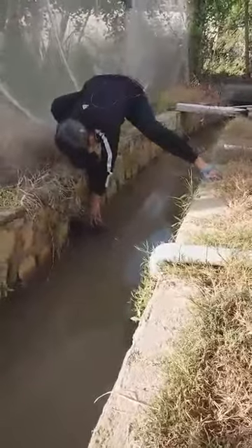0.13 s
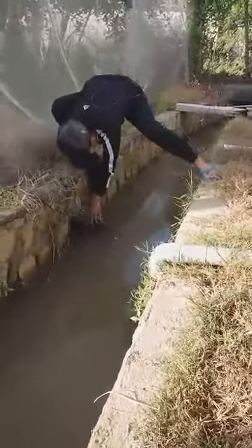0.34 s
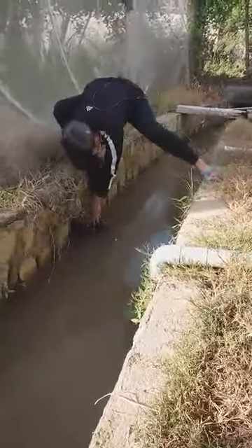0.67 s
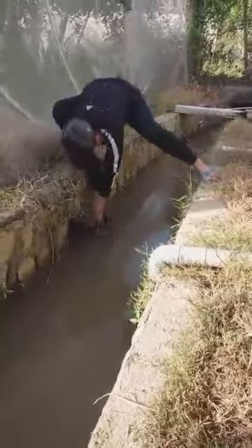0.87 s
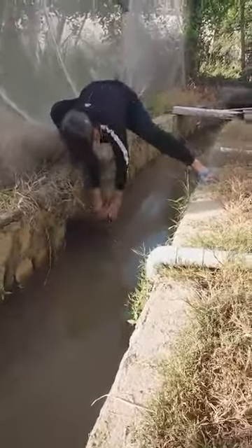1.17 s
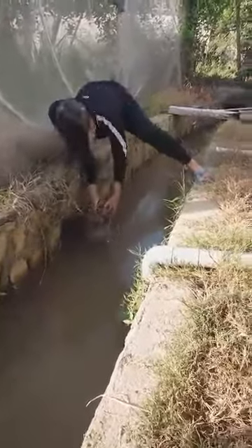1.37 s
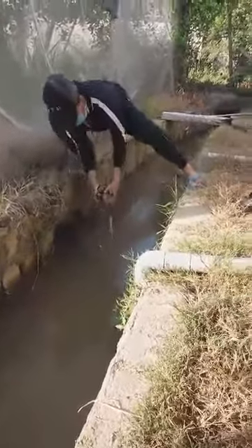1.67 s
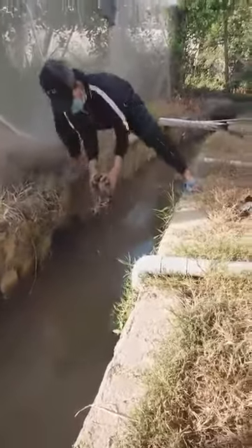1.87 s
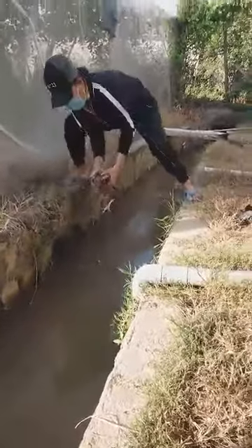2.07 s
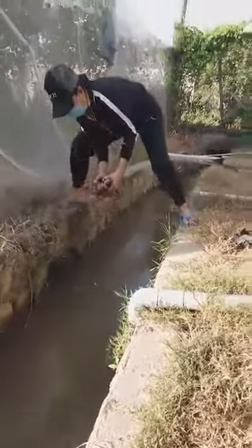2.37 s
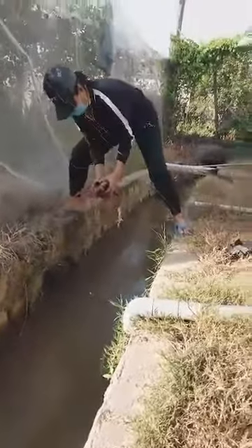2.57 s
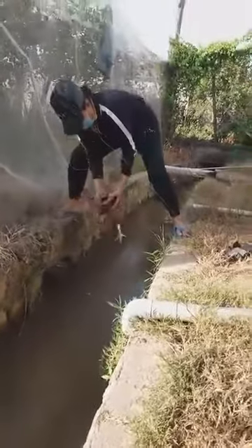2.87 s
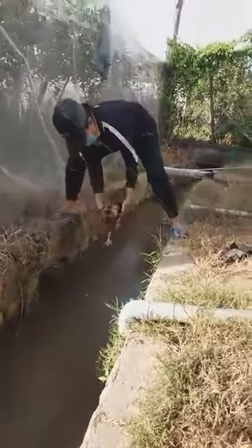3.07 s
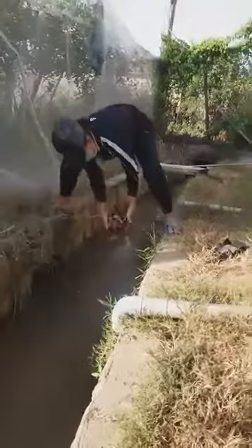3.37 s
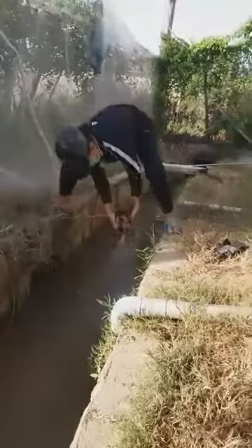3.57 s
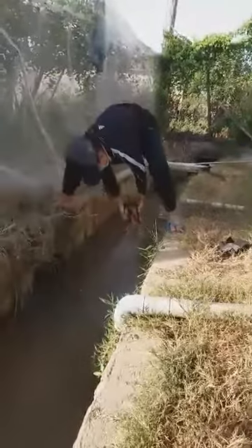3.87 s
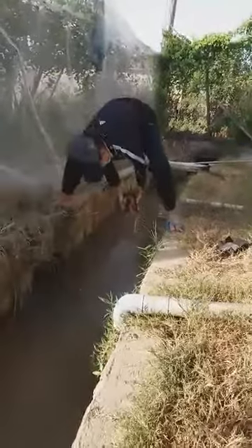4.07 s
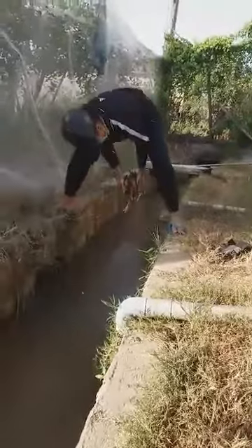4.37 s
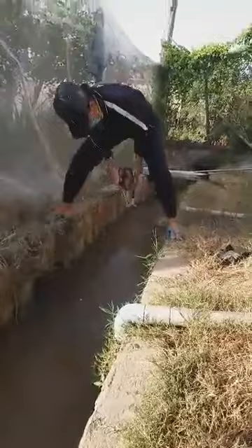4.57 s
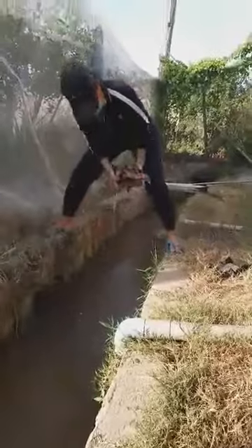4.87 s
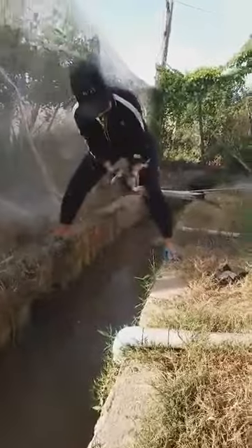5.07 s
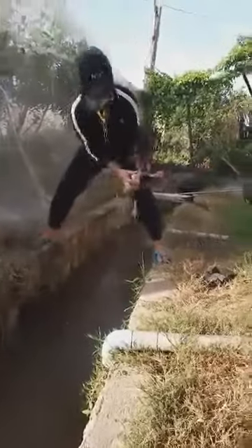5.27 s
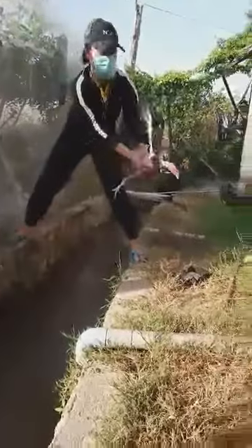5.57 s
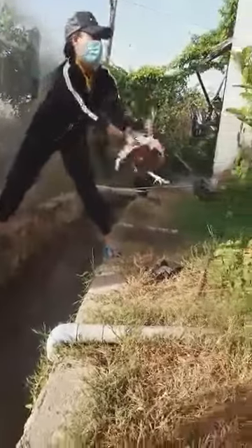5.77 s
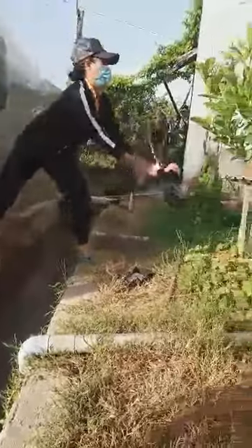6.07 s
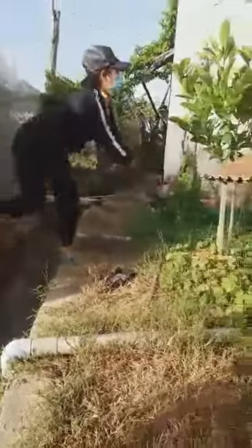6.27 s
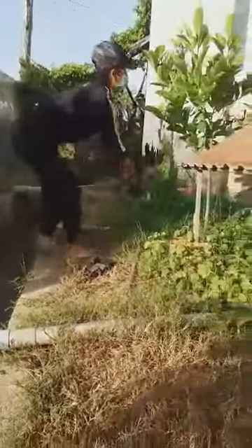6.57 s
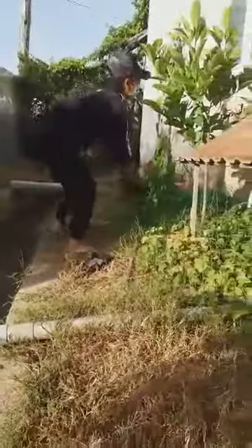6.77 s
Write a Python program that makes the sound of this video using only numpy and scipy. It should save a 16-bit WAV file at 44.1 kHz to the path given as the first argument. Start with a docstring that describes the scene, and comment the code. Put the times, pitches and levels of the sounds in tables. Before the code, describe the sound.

Hoarse, whistly chicken gasps over sparse water drops outdoors, then crunching steps in dry grass, one long rasping squawk and a short higher one.

```python
"""Soaked chicken by a ditch

A soaked chicken, lifted out of a ditch a few metres away, gasps, whistles and hisses, then squawks twice.
Its airway is noise and gliding tones shaped by resonances; its squawks are two pulse trains cut by a flutter.
Filtered noise bursts make the drops of water and the dry grass that crackles and thuds under moving feet.
Decaying noise echoes stand for ditch sides, a wall and the open; rumble, air, birds and an insect lie behind."""
import sys
import numpy as np
from scipy import signal
from scipy.fft import rfft, irfft
from scipy.io import wavfile
from scipy.ndimage import uniform_filter1d

SR = 44100
rng = np.random.default_rng(int(sys.argv[2]) if len(sys.argv) > 2 else 0)


def persist_wave(psi):
    """Save psi, clipped to +-1, as 16-bit WAV."""
    counts = np.round(np.clip(psi, -1, 1) * 32767).astype(np.int16)
    wavfile.write(sys.argv[1], SR, np.atleast_2d(counts).T)


N = 305172  # samples, about 6.9 s
T = np.arange(N) / SR

# spectrum of the distant rumble: (frequency [Hz], level [dB])
RUMBLE_SPECTRUM = [(15, -15), (33, -45), (42, -21), (55, -1.5), (75, 2.5), (110, -0.5), (155, -1.5),
                   (210, -6.5), (290, -15), (400, -20), (550, -41)]
# spectrum of the open air: (frequency [Hz], level [dB])
AIR_SPECTRUM = [(240, -28.5), (400, -7), (587, -6.5), (835, -9), (982, -10), (1070, -8.5), (1930, -12.5),
                (2310, -10), (3280, -15), (4610, -15), (5580, -14), (7490, -40.5), (8550, -26.5),
                (12500, -28.5), (13500, -37)]
RUMBLE_DB, AIR_DB = -54, -63.5
# thin distant bird calls: (time [s], length [s], level [dB], frequency [Hz])
BIRD_CALLS = [(.05, 0.73, -76, 6170), (.03, 0.12, -60.5, 1940), (.1, 0.082, -65, 3870),
              (.2, .11, -70, 4200), (.62, 0.16, -70, 4130), (1.75, 0.18, -70, 4120), (2.0, 0.48, -75, 4900),
              (3.0, 0.041, -67.5, 6100), (3.3, 0.12, -72, 4800), (3.75, 0.031, -64, 3480),
              (3.76, .14, -71, 5660), (4.1, 0.076, -77, 4750), (4.42, 0.54, -77, 4600)]
INSECT_HZ, INSECT_DB, INSECT_UNTIL_S, CHIRP_EVERY_S, CHIRP_S = 8900, -75, 1.05, 0.199, 0.24

# gasps: (time [s], length [s], effort [dB], swell from start to end [dB], throat resonance at the start [Hz],
# in the middle [Hz], at the end [Hz], hiss relative to the effort, before a common trim [dB])
GASPS = [ (0.252, 0.028, -40.5, -14, 1820, 1900, 2000, -22),
         (0.478, 0.032, -41.5, 0, 1710, 1780, 1690, -10), (0.547, 0.029, -48, 2, 1980, 1860, 1690, -5),
         (0.734, .2, -41, -5, 1990, 2455, 2460, -7.5), (0.993, .06, -41, 1, 1430, 1400, 1830, -5.5),
         (1.09, 0.095, -33.5, -3.5, 2470, 2416, 1860, -6.5),
         (1.264, 0.026, -38.5, 15.5, 2020, 1960, 1890, -15), (1.35, 0.11, -35, 5.5, 2190, 2170, 1910, -2.5),
         (1.56, 0.047, -44.5, 4, 1600, 1680, 2180, -10), (1.654, 0.05, -35, -10, 1870, 1800, 1600, -8),
         (1.908, 0.032, -32, 9, 1780, 1685, 1510, -12.5), (2.11, 0.24, -33, 3.5, 1810, 2143, 1940, -7),
         (2.517, 0.13, -33.5, -9, 1825, 2280, 1850, -4), (2.867, 0.067, -31.5, -2.5, 1840, 1877, 1690, -14),
         (3.146, 0.041, -35.5, -2, 1810, 1695, 1715, -10), (3.418, 0.048, -39, 11, 1930, 1776, 1670, -15.5),
         (3.665, 0.054, -30, -6, 1970, 2030, 1740, -17), (3.962, 0.04, -34.5, 3, 1790, 1730, 1720, -14),
         (4.288, 0.038, -46.5, 5, 1740, 1640, 1650, -9), (4.787, 0.029, -40, 7.5, 1850, 1770, 1555, -16),
         (5.008, .037, -39, 8.5, 1780, 1790, 1500, -10.5), (5.202, .049, -29, 0, 1650, 1720, 1800, -12),
         (5.41, 0.12, -30, 10, 2000, 2320, 1760, -16.5), (5.7, .11, -30, 11, 1990, 1890, 1640, -18),
         (6.031, .12, -31.5, 3, 1720, 1633, 1590, -11.5), (6.866, 0.051, -34, 9, 2070, 1805, 1750, -24)]
# spectrum of air in the windpipe: (frequency [Hz], level [dB])
WINDPIPE_SPECTRUM = [(410, -53.5), (700, -6.5), (943, -23.5), (1100, 2.5), (1210, -7.5), (1380, 9),
                     (1500, -22), (1620, -26), (1780, 11), (2060, -32), (2230, 16.5), (2580, -19.5),
                     (2890, -20), (3160, -14), (4800, -24.5), (6240, -105), (10600, -120)]
# spectrum of the hiss: (frequency [Hz], level [dB])
HISS_SPECTRUM = [(2400, -8), (3800, -11.5), (4800, -3.5), (5300, -15.5), (5900, -1.5), (6400, -4),
                 (7100, -10), (8200, -25), (10100, -18.5), (11500, -22), (13300, -21)]
# resonances of the throat: (multiple of the main resonance, width [Hz], level [dB])
THROAT_RESONANCES = [(0.758, 233, 3), (1.0, 232, 8), (1.221, 280, 6), (1.55, 352, -5.5), (1.92, 312, -9.5),
                     (3.0, 400, -46.5)]
# narrow rings of the beak in the hiss: (multiple of the throat resonance, width [Hz], level [dB])
BEAK_RINGS = [(1.5, 200, -5), (2.0, 200, -4), (2.75, 220, -7.5), (3.05, 220, -24)]
GASP_ATTACK_S, GASP_RELEASE_DB_PER_S = 0.0035, 860
SLACK_DB_PER_S = 32.5  # the longer a gasp, the more its push slackens midway
HISS_FADE_DB = -6  # the hiss weakens from start to end as the beak closes
# listed whistles of the air jet: (time [s], length [s], level [dB], start [Hz], end [Hz])
WHISTLES = [(.755, 0.011, -28, 2070, 2240), (0.786, 0.0063, -28, 2490, 2570),
            (1.026, 0.0085, -30, 1376, 1440), (1.132, 0.011, -26, 2310, 2430),
            (1.928, 0.0294, -23, 1790, 1560), (2.112, 0.013, -22.5, 1823, 1750),
            (2.138, 0.011, -21.5, 1885, 1760), (2.315, 0.0064, -27, 1980, 2010),
            (2.328, 0.049, -30, 1930, 1604), (2.514, .028, -24, 1814, 2130),
            (2.553, 0.012, -27, 1936, 2170), (2.574, 0.0072, -24.5, 2260, 1930),
            (2.877, 0.013, -21.5, 1780, 1824), (2.906, 0.0075, -21, 1850, 1830),
            (3.173, 0.01, -21.5, 1773, 1650), (3.677, 0.021, -21.5, 1744, 2514),
            (3.702, 0.013, -24.5, 1750, 1810), (3.975, 0.011, -26, 1780, 1850),
            (3.994, .009, -26.5, 1684, 1670), (5.226, .025, -19, 1814, 1664),
            (5.504, 0.011, -22, 1980, 1840), (5.526, 0.02, -24.5, 1870, 1685),
            (5.781, 0.015, -18, 1980, 1920), (5.803, 0.015, -19, 1777, 1767), (6.1, 0.016, -23, 1420, 1450),
            (6.124, 0.017, -20, 1830, 1760)]
# further whistles by chance: rate, length, level above the effort, largest detuning as a share of the resonance
CHANCE_PER_S, CHANCE_S, CHANCE_DB, CHANCE_DETUNE = 16, .01, 5, 0.046
# wet catches in the throat: (time [s], peak of the squeak before a common trim [dB], ring [Hz])
CATCHES = [(.484, -27.5, 1577), (1.389, -15, 2077), (1.446, -13.5, 2105), (2.536, -14.5, 2037),
           (3.69, -44, 2080)]
# wheezes and gurgles in the airway: (time [s], length [s], level before the bass cut [dB], resonance [Hz])
GURGLES = [(.75, .16, -53.5, 667), (.79, 0.083, -50, 3490), (1.0, 0.041, -44.5, 900),
           (1.08, 0.021, -43, 3430), (1.115, 0.047, -41.5, 496), (1.117, .018, -38.5, 980),
           (1.385, 0.049, -51.5, 490), (1.44, .035, -42, 496), (1.44, 0.026, -41, 1015),
           (2.3, 0.083, -57, 780), (2.52, 0.051, -45.5, 596), (2.858, 0.021, -44.5, 3330),
           (3.972, .045, -45, 1310), (3.975, 0.047, -50, 3120), (4.29, .037, -52, 3380),
           (4.8, 0.032, -46, 1275), (5.025, 0.033, -41, 1170)]

# drops and splashes on the water: (time [s], peak before a common trim [dB])
DROPS = [(1.049, -28.5), (1.2579, -34.5), (1.2768, -29.5), (1.3588, -26), (1.3702, -28), (1.409, -40),
         (1.519, -28), (1.604, -36), (2.0252, -44), (2.4627, -34.5), (3.278, -44)]
# spectrum of a splash: (frequency [Hz], level [dB])
SPLASH_SPECTRUM = [(400, -10), (1200, -7), (2500, -8.5), (6000, -9), (8000, -21.5), (10000, -14),
                   (13000, -18)]

# steps and shuffles: (time [s], length [s], crackle [dB], thud before a common trim [dB])
STEPS = [(4.921, 0.13, -57.5, -74), (5.026, 0.12, -53.5, -45), (5.23, 0.053, -57, -57),
         (5.367, 0.05, -56, -41), (5.403, 0.22, -45, -62), (5.687, 0.19, -45.5, -51),
         (6.001, 0.15, -53, -61), (6.211, 0.05, -58, -40.5), (6.39, 0.05, -63, -51),
         (6.541, 0.18, -44, -46)]
# spectrum of a footfall: (frequency [Hz], level [dB])
THUD_SPECTRUM = [(50, -20), (90, 5), (180, 2.5), (280, 2.5), (400, -17), (800, -7.5), (1500, -28)]
# dry stalks snapping underfoot: (time [s], peak before a common trim [dB])
SNAPS = [(5.038, -36), (5.0624, -35), (5.1168, -34), (5.2392, -24), (5.2561, -21), (5.2714, -52),
         (5.392, -25), (5.4205, -24), (5.4893, -35), (5.572, -34.5), (5.6471, -26), (5.6537, -28),
         (5.7036, -26), (5.734, -20.5), (5.897, -35.5), (5.9658, -28.5), (6.0108, -29.5), (6.1313, -28.5),
         (6.4093, -28.5), (6.672, -27)]
# spectrum of dry stalks: (frequency [Hz], level [dB])
STALK_SPECTRUM = [(150, -36), (250, -5.5), (586, -1.5), (740, -1.5), (950, 1.5), (1390, 3), (2380, 4.5),
                  (3670, -4), (4640, 2), (6480, -3), (7530, -14), (12400, -10), (13500, -54)]
# between steps the grass keeps rustling and the feet shuffle
WALK_FROM_S, RUSTLE_DB, SHUFFLE_DB, THUD_TRIM_DB = 5.08, -53, -51, -4

# closed-beak moan before the first squawk: (level [dB], start [Hz], end [Hz])
MOAN = (-37.5, 244, 355)
MOAN_S, MOAN_LENGTH_S, MOAN_WAVER = 6.108, .085, .025  # the waver is an rms share of the pitch

# squawks: (time [s], time until the beak starts to shut [s], opening time [s], low resonance [dB],
# open beak [dB], hiss [dB], low resonance [Hz]); levels before the motion of the beak
SQUAWKS = [(6.167, 0.38, 0.058, -27, -16, -37.5, 783), (6.688, 0.098, 0.017, -23, -17, -37.5, 864)]
# voice of the long squawk: (time [s], pitch [Hz], second membrane [Hz], roughness [0-1], flutter [1/s])
LONG_VOICE = [(6.16, 349, 398.8, 0, 76), (6.18, 385.3, 439.1, 0.1, 77), (6.2, 519, 557, 0.22, 82),
              (6.225, 597.4, 693, 0.18, 85), (6.25, 612.6, 694.4, 0.57, 110),
              (6.31, 626.6, 686.8, 0.43, 115), (6.38, 641.5, 798.7, 0.49, 97),
              (6.54, 669.6, 769.4, 0.64, 88), (6.62, 724.3, 800, 0.86, 92)]
# voice of the short squawk: (time [s], pitch [Hz], second membrane [Hz], roughness [0-1], flutter [1/s])
SHORT_VOICE = [(6.69, 836, 696.4, .33, 85.34), (6.712, 890, 708.6, 0.48, 75.3),
               (6.731, 858.5, 792.6, 0.9, 84.4), (6.795, 930.3, 812, 0.86, 93.6),
               (6.819, 923, 700, 0.31, 54.5), (6.86, 803.6, 684, 1, 50.5)]
# spectrum of the low throat resonance, shifted for each squawk: (frequency [Hz], level [dB])
LOW_THROAT_SPECTRUM = [(300, -58.5), (480, -16.5), (590, -9), (690, -3.5), (820, 11.5), (1020, -2.5),
                       (1200, -8.5), (1600, -73)]
LOW_THROAT_HZ = 823  # where the resonance lies in that spectrum
# spectrum of the open beak: (frequency [Hz], level [dB])
OPEN_BEAK_SPECTRUM = [(800, -23.5), (1080, -0.5), (1290, 0.5), (1420, 0.5), (1570, 6), (1780, 0.5),
                      (1980, 3.5), (2250, -5), (2520, 1), (2700, -3), (2950, -8), (3400, -20.5),
                      (4500, -61)]
# spectrum of the rasping hiss: (frequency [Hz], level [dB])
RASP_SPECTRUM = [(2400, -29.5), (3200, 12.5), (4000, 15.5), (4700, 11), (5400, 0), (6100, 3), (7000, -8),
                 (8000, -49), (10000, -27), (13000, -64)]
AIR_SHARE = .33  # share of the harsh sound's power that is noise
SQUAWK_ATTACK_S, SHUT_DB, SHUT_DB_PER_S = 0.014, -31, 348  # the beak opens from SHUT_DB and shuts steadily
LOW_SHUT_DB, RASP_SHUT_DB = 2.5, -13  # a shut beak favours the low resonance; an unopened one holds back hiss
VOICE_HOLD_S, VOICE_RELEASE_DB_PER_S = .04, 1093  # the voice outlasts the open beak briefly
PUFF_DB, PUFF_S = 6, 0.018  # and ends in a puff of hiss

CEILING, EDGE_HZ = .62, 13350  # soft limit of the amplitude; upper edge of the band


def amp(db):
    """Decibel law: level to amplitude gain."""
    return 10 ** (np.asarray(db) / 20)


def unit(x):
    """Power normalisation: scales to rms 1."""
    return x / np.sqrt(np.mean(x ** 2) + 1e-20)


def steady(x, size):
    """Automatic gain: holds the rms near 1 over a sliding window of size samples, leaving faster grain."""
    return x / np.sqrt(abs(uniform_filter1d(x ** 2, size)) + 1e-12)


def follow(rows, t):
    """Linear interpolation: the columns of a table at the times t."""
    s, *columns = np.transpose(rows)
    return [np.interp(t, s, c) for c in columns]


def add(mix, s, sound):
    """Superposition: adds a sound into the mix at time s."""
    part = mix[max(round(s * SR), 0):][:len(sound)]
    part += sound[:len(part)]


def colour(x, points):
    """Minimum-phase filtering: a causal response with a given (frequency [Hz], level [dB]) spectrum."""
    f, db = np.transpose(points)
    hz = abs(np.fft.fftfreq(4096, 1 / SR))
    log_gain = np.log(amp(np.interp(np.log(hz + 1), np.log(f + 1), db)))
    # the Hilbert transform of the log gain supplies the phase
    response = np.exp(np.conj(signal.hilbert(log_gain)))
    taps = np.fft.ifft(response).real[:2048]
    return signal.oaconvolve(x, taps)[:len(x)]


def resonate(x, hz, width):
    """Damped resonance: shifts hz to zero, smooths and shifts back, so that hz may be a curve."""
    turn = np.exp(2j * np.pi * np.cumsum(hz * np.ones(len(x))) / SR)
    r = np.exp(-np.pi * width / SR)
    return 2 * (turn * signal.lfilter([1 - r], [1, -r], x / turn + 1e-18)).real


def resonate_twice(x, hz, width):
    """Cascaded resonance: two equal stages give steeper skirts."""
    return resonate(resonate(x, hz, width), hz, width)


def noise():
    """White noise: equal power at all frequencies, for the whole scene."""
    return rng.standard_normal(N)


def wander(rate):
    """Band-limited chance: smooth noise of rms 1, up to about rate changes a second."""
    lowpass = np.exp(-(np.fft.rfftfreq(N, 1 / SR) / rate) ** 2)
    return unit(irfft(rfft(noise()) * lowpass, N))


def during(s, length):
    """Time windowing: the samples that an event covers."""
    return slice(int(s * SR), min(int((s + length) * SR), N))


def bands(rows, width, flutter):
    """Narrow-band noise: soft-edged fluttering bursts, each in one steep resonance."""
    air, out = noise() * flutter, np.zeros(N)
    for s, length, db, hz in rows:
        burst = air[max(int(s * SR), 0):][:int(length * SR)]
        burst = resonate_twice(burst, hz, width)
        add(out, s, amp(db) * unit(burst * signal.windows.tukey(len(burst), .5)))
    return out


def rings(resonances, jets, at, hz):
    """Resonator bank: multiples of a moving pitch, each blown by its own sputtering jet."""
    return sum(amp(db) * unit(resonate_twice(jet[at], multiple * hz, width))
               for (multiple, width, db), jet in zip(resonances, jets))


def ticks(rows, spectrum, decay, tail_db, level_db=.5):
    """Impulsive excitation: each event is a short crack with a soft onset and a short spatter."""
    t, out = np.arange(2600) / SR - .01, np.zeros(N)
    onset = np.exp(np.minimum(t, 0) / .0016)
    envelope = onset * (np.exp(-abs(t) / decay) + amp(tail_db) * np.exp(-abs(t) / 0.022))
    for (s, db), grain in zip(rows, rng.standard_normal((len(rows), len(t)))):
        tick = colour(grain * envelope, spectrum)
        add(out, s + t[0], amp(db + level_db) * tick / abs(tick).max())
    return out


def background():
    """Broadband ambience: distant rumble and a gently swelling hush of open air."""
    rumble = unit(colour(noise(), RUMBLE_SPECTRUM)) * amp(RUMBLE_DB + 0.44 * wander(3.6))
    hush = unit(colour(noise(), AIR_SPECTRUM)) * amp(AIR_DB + 0.27 * wander(15))
    return rumble + hush


def wildlife():
    """Narrow-band calls: distant birds, and an insect that chirps evenly for the first second."""
    starts = np.arange(0, INSECT_UNTIL_S - CHIRP_S, CHIRP_EVERY_S)
    chirps = [(s, CHIRP_S, INSECT_DB, INSECT_HZ) for s in starts]
    return bands(BIRD_CALLS + chirps, width=470, flutter=amp(3.7 * wander(22)))


def gasps(flutter_db=5.0, sputter_db=5, breath_db=-5, hiss_trim_db=-1, duck_db=-5, edge_db=-3):
    """Turbulence in a resonant tube: air flutters past water, throat resonances sputter and whistles lock in."""
    air = noise() * amp(flutter_db * wander(77))
    pipe, hiss = colour(air, WINDPIPE_SPECTRUM), colour(air, HISS_SPECTRUM)
    jets = [noise() * amp(sputter_db * wander(110)) for _ in THROAT_RESONANCES]
    out, locked = whistles(WHISTLES + chance_whistles())
    for row in GASPS:
        start, length = row[:2]
        at = during(start - .02, length + .06)
        effort, hz, bright = gasp_shape(row, T[at] - start)
        throat = amp(breath_db) * unit(pipe[at]) + rings(THROAT_RESONANCES, jets, at, hz)
        # the beak's own high ring
        edge = resonate(resonate(hiss[at], 2200 + 1.75 * hz, 820), 2200 + 1.77 * hz, 800)
        beak = unit(unit(hiss[at]) + amp(edge_db) * unit(edge) + rings(BEAK_RINGS, jets, at, hz))
        # a whistle takes airflow from the throat noise
        sound = steady(throat, size=600) * amp(duck_db * locked[at])
        sound += amp(bright + hiss_trim_db) * beak
        add(out, T[at.start], amp(effort) * sound)
    return out


def gasp_shape(row, t):
    """Breath envelope: effort, throat resonance and hiss t seconds in, by attack, sloping hold and release."""
    _, length, db, swell_db, start_hz, middle_hz, end_hz, hiss_db = row
    u = np.clip(t / length, 0, 1)
    arch = 4 * u * (1 - u)  # 1 midway, 0 at both ends
    attack = -20 * np.log10(1 + np.exp(1 - t / GASP_ATTACK_S))
    hold = swell_db * (u - .5) - SLACK_DB_PER_S * length * arch
    release = GASP_RELEASE_DB_PER_S * np.maximum(t - length, 0)
    hz = start_hz + (end_hz - start_hz) * u + (middle_hz - (start_hz + end_hz) / 2) * arch
    return db + attack + hold - release, hz, hiss_db + HISS_FADE_DB * (u - .5)


def chance_whistles():
    """Random triggering: rows for brief whistles near the throat resonance, where no listed one sounds."""
    rows = []
    for gasp, draws in zip(GASPS, rng.random((len(GASPS), 12, 4))):
        start, length = gasp[:2]
        for luck, place, *detune in draws:
            s = start + place * length - CHANCE_S / 2
            busy = any(other - CHANCE_S < s < other + span for other, span, *_ in WHISTLES)
            if luck < CHANCE_PER_S * length / len(draws) and not busy:
                effort, hz, _ = gasp_shape(gasp, place * length)
                glide = hz * (1 + CHANCE_DETUNE * (2 * np.array(detune) - 1))
                rows.append((s, CHANCE_S, effort + CHANCE_DB, *glide))
    return rows


def whistles(rows, overtone_db=-19, quaver=0.0039, spill=0.003057):
    """Self-oscillating jet: gliding tones with weak fuzzy overtones, and the share of airflow they take."""
    waver, fuzz, out, locked = wander(240), wander(370), np.zeros(N), np.zeros(N)
    for (s, length, db, start, end), tints in zip(rows, rng.standard_normal((len(rows), 2))):
        at = during(s - spill / 2, length + spill)
        hz = np.interp(T[at], [s, s + length], [start, end]) * (1 + quaver * waver[at])
        phase = 2 * np.pi * np.cumsum(hz) / SR
        swell = signal.windows.tukey(len(hz), .75)
        overtones = sum(amp(1.8 * tint - 2 * k) * np.sin(k * phase + fuzz[at])
                        for k, tint in enumerate(tints, 2))
        add(out, s - spill / 2, amp(db) * swell * (np.sin(phase) + amp(overtone_db) * overtones))
        add(locked, s - spill / 2, swell)
    return out, np.minimum(locked, 1)


def catches(rise=0.0039, trim_db=-7, spit_db=-9):
    """Film rupture: a film of water gives way with a brief squeak, falling in pitch, and a spit of air."""
    t, out = np.arange(1800) / SR, np.zeros(N)
    envelope = (t / rise * np.exp(1 - t / rise)) ** 2
    spits = colour(noise(), WINDPIPE_SPECTRUM)
    for s, db, hz in CATCHES:
        squeak = np.sin(2 * np.pi * np.cumsum(hz * (1.02 - 4 * t)) / SR)
        spit = unit(spits[int(s * SR):][:len(t)])
        add(out, s - .001, amp(db + trim_db) * envelope * (squeak + amp(spit_db) * spit))
    return out


def gurgles():
    """Cavity resonance: fluttering air in a small wet airway, too small to give bass."""
    bursts = bands(GURGLES, width=144, flutter=amp(4.9 * wander(140)))
    return colour(bursts, [(200, -12), (450, 1)])


def drops():
    """Impact on water: each drop is a very short crack with a faint spatter."""
    return ticks(DROPS, SPLASH_SPECTRUM, decay=0.00036, tail_db=-13.0)


def grass(per_s=700, spread_db=-0.5):
    """Granular noise: countless small stalks crackle in clumps over the dull thud of steps."""
    crackle, thud = treading()
    sizes = amp(spread_db * np.minimum(rng.exponential(1, N), 4))
    grains = (rng.random(N) < per_s / SR) * sizes * np.sign(noise())
    clumps = amp(3.5 * wander(45))
    stalks = unit(colour((unit(grains) + 3.0 * noise()) * clumps, STALK_SPECTRUM))
    return crackle * stalks + thud * unit(colour(noise(), THUD_SPECTRUM))


def treading():
    """Amplitude envelopes: each step swells the crackle and thud above the rustle of walking."""
    walking = np.clip((T - WALK_FROM_S) * 20, 0, 1)
    crackle, thud = amp(RUSTLE_DB) * walking, amp(SHUFFLE_DB) * walking
    for s, length, crackle_db, thud_db in STEPS:
        press = signal.windows.tukey(int(length * SR), .9)
        add(crackle, s, amp(crackle_db) * press)
        add(thud, s, amp(thud_db + THUD_TRIM_DB) * press)
    return crackle, thud


def snaps():
    """Brittle fracture: each dry stalk gives one crack with a faint spatter."""
    return ticks(SNAPS, STALK_SPECTRUM, decay=0.01, tail_db=-24)


def moan():
    """Pure tone: a slightly wavering pitch rises before the beak opens."""
    db, start_hz, end_hz = MOAN
    at, out = during(MOAN_S, MOAN_LENGTH_S), np.zeros(N)
    hz = np.geomspace(start_hz, end_hz, len(T[at])) * (1 + MOAN_WAVER * wander(120)[at])
    tone = np.sin(2 * np.pi * np.cumsum(hz) / SR)
    add(out, MOAN_S, amp(db) * tone * signal.windows.tukey(len(hz), .4))
    return out


def squawks(jitter=.012, slip=0.2, closing=0.99, second_db=0):
    """Coupled membranes: the syrinx buzzes; when forced, a second membrane joins and a flutter chops both."""
    hz, second_hz, rough, flutter = follow(LONG_VOICE + SHORT_VOICE, T)
    turns = np.cumsum(hz * (1 + jitter * wander(121.7))) / SR
    second_turns = np.cumsum(second_hz * (1 + jitter * wander(157))) / SR
    flaps = np.cumsum(flutter * (1 + .14 * wander(50))) / SR
    # each flap jolts the cycle out of step
    knock = slip * uniform_filter1d(noise()[flaps.astype(int)], size=40)
    gate = unit(uniform_filter1d(0.45 + np.exp(-(flaps % 1) / closing), size=30))
    uneven, air, out = amp(6.3 * wander(600)), noise(), np.zeros(N)
    for row in SQUAWKS:
        start, length = row[:2]
        at = during(start, length + 2 * VOICE_HOLD_S)
        clean = buzz(turns[at])
        second = buzz(second_turns[at] - .5 * knock[at])
        broken = unit(uneven[at] * (buzz(turns[at] + knock[at]) + amp(second_db) * second))
        harsh = gate[at] * (np.sqrt(1 - AIR_SHARE) * broken + np.sqrt(AIR_SHARE) * air[at])
        drive = (1 - rough[at]) ** 2 * clean + rough[at] * harsh
        low_db, beak_db, rasp_db = squawk_shape(row, T[at] - start)
        throat = [(f * row[-1] / LOW_THROAT_HZ, db) for f, db in LOW_THROAT_SPECTRUM]
        sound = amp(low_db) * steady(colour(drive, throat), size=650)
        sound += amp(beak_db) * steady(colour(drive, OPEN_BEAK_SPECTRUM), size=480)
        rasp = steady(colour(harsh + 1.3 * air[at], RASP_SPECTRUM), size=650)
        sound += amp(rasp_db) * np.sqrt(np.minimum(2 * rough[at], 1)) * rasp
        add(out, start, sound * signal.windows.tukey(len(sound), .04))
    return out


def buzz(turns):
    """Harmonic series: fourteen equal cosines form a pulse train that follows a count of cycles."""
    orders = np.arange(1, 15)[:, None]
    return unit(np.cos(2 * np.pi * orders * turns).sum(0))


def squawk_shape(row, t):
    """Variable aperture: levels of low resonance, open beak and hiss as the beak opens, holds and shuts."""
    _, length, opening, low_db, beak_db, hiss_db, _ = row
    unopened = np.exp(-t / opening)
    beak = SHUT_DB * unopened - SHUT_DB_PER_S * np.maximum(t - length, 0)
    after = t - length - VOICE_HOLD_S
    voice = 20 * np.log10(np.clip(t / SQUAWK_ATTACK_S, 1e-3, 1))
    release = VOICE_RELEASE_DB_PER_S * np.maximum(after, 0)
    low = low_db + voice - release + LOW_SHUT_DB * (1 - amp(beak))
    puff = PUFF_DB * np.exp(-(after / PUFF_S) ** 2)
    rasp = hiss_db + voice - release / 2 + RASP_SHUT_DB * unopened + puff
    return low, beak_db + voice + beak, rasp


def yard(x, near_db=-13, wall_s=0.035, wall_db=-24, tail_db=-23, t60=0.28):
    """Reflection and decay: quick returns from the ditch sides, one wall echo and a thin outdoor tail."""
    t = np.arange(SR // 2) / SR
    near, far, wall = rng.standard_normal((3, len(t)))
    near *= (t > .002) * np.exp(-t / 0.006)
    wall *= (t > wall_s) * np.exp(-abs(t - wall_s) / 0.013)
    far *= (t > .015) * np.exp(-np.log(1000) * t / t60)
    levels = [(near_db, near), (wall_db, wall), (tail_db, far)]
    echoes = sum(amp(db) * part / np.linalg.norm(part) for db, part in levels)
    return x + signal.fftconvolve(x, echoes)[:N]


def scene():
    """Mid-side stereo: everything lies straight ahead; only the treble is spread between the ears."""
    chicken = gasps() + catches() + gurgles() + moan() + squawks()
    feet = grass() + snaps()
    mid = yard(chicken + drops() + feet) + background() + wildlife()
    spread = [(2800, -85), (4000, -38.5), (5500, -8.5), (7000, -13.5), (9000, -7), (13000, -9.5)]
    side = colour(mid * wander(150), spread)
    return np.array([mid + side, mid - side])


def record(dry):
    """Saturation and band limit: a soft limiter rounds the tallest peaks, then a steep low-pass."""
    limited = dry / (1 + (dry / CEILING) ** 8) ** (1 / 8)
    lowpass = signal.firwin(401, EDGE_HZ, window=("kaiser", 8), fs=SR)
    return signal.oaconvolve(limited, lowpass[None], "same")


dry = scene()
out = record(dry)
persist_wave(out)
```